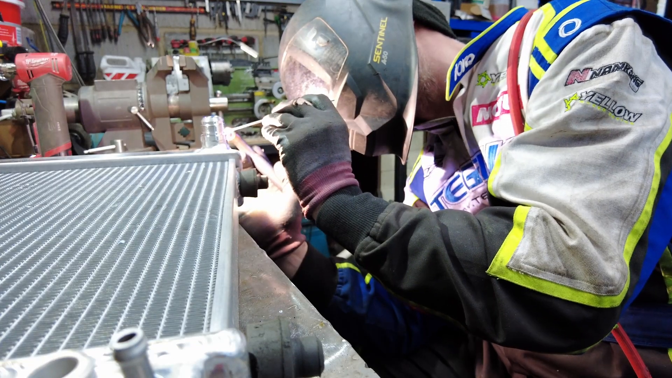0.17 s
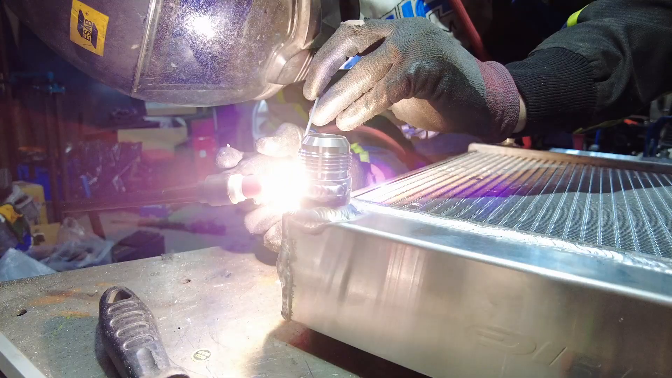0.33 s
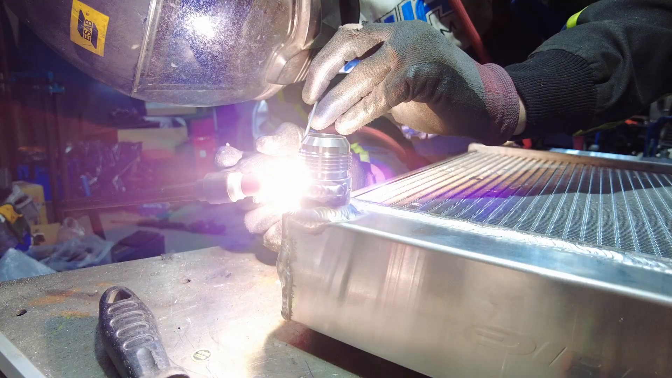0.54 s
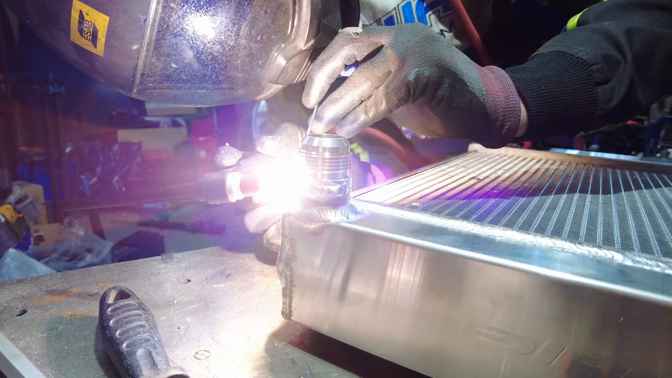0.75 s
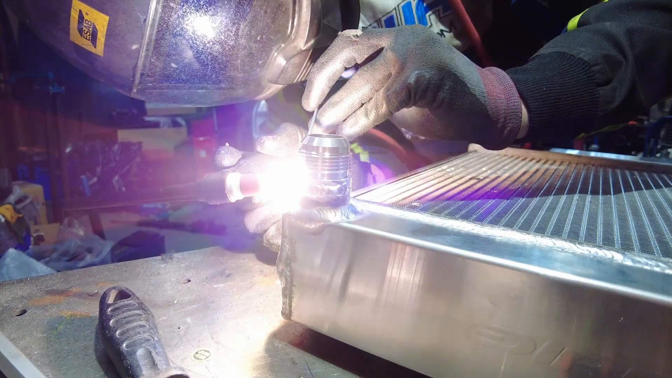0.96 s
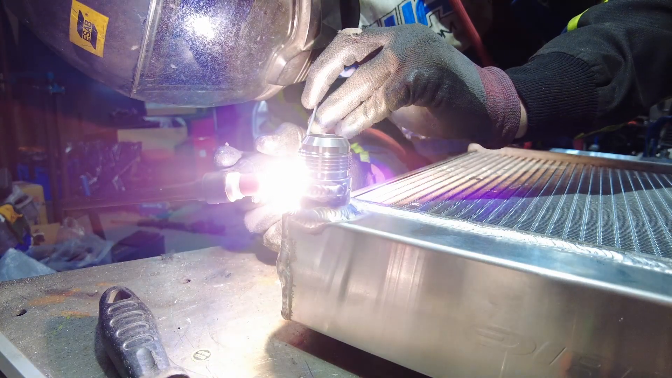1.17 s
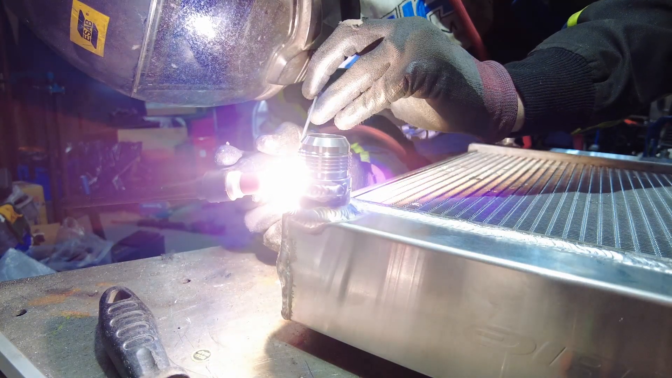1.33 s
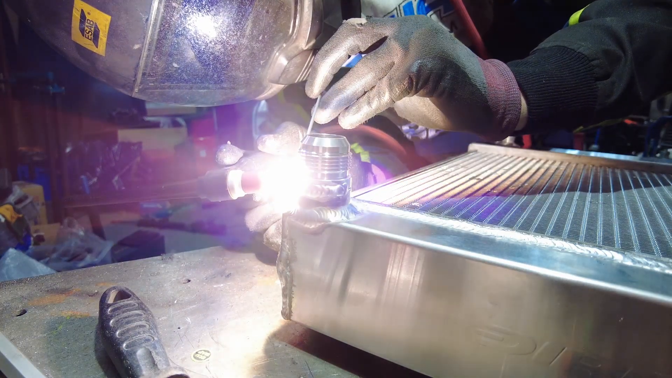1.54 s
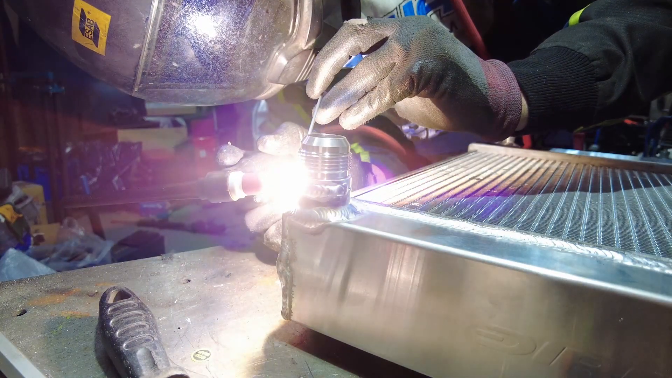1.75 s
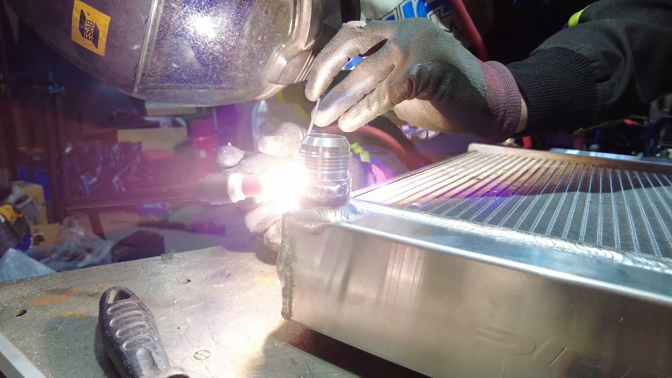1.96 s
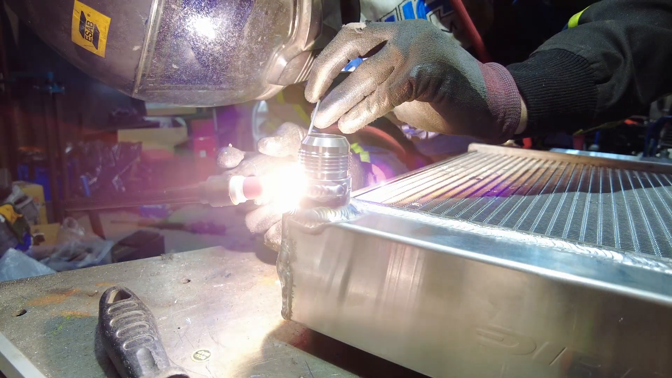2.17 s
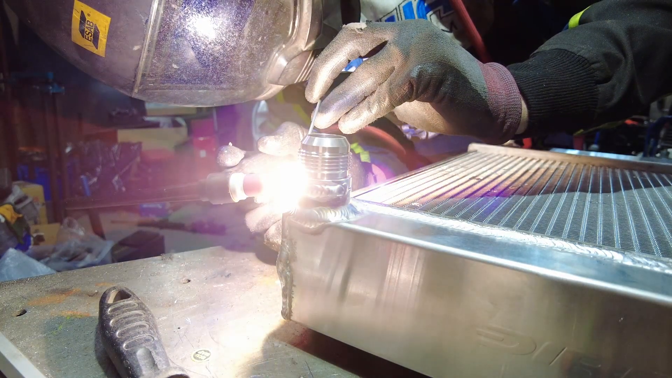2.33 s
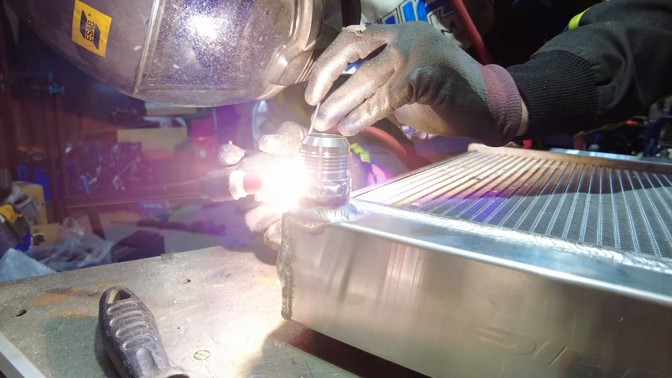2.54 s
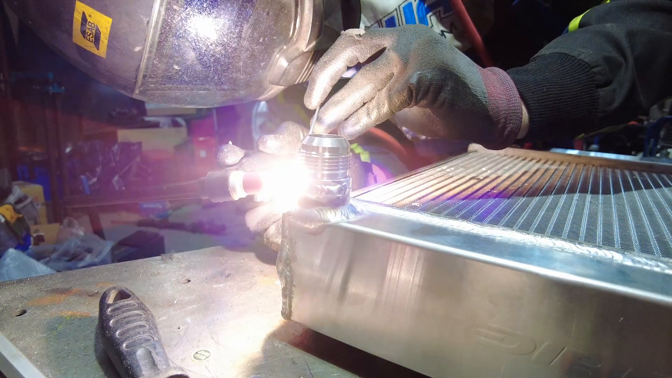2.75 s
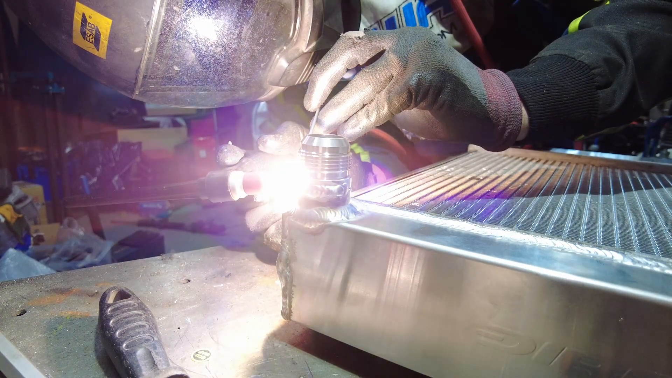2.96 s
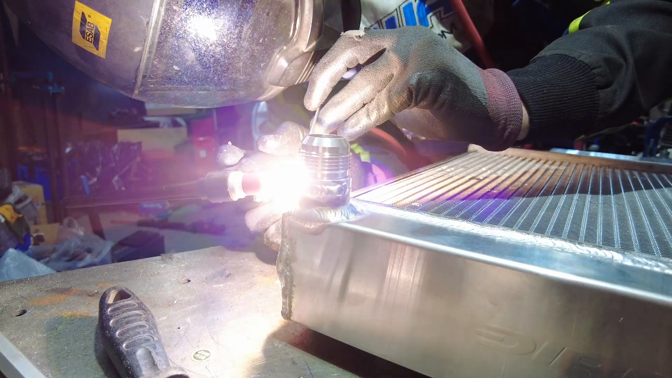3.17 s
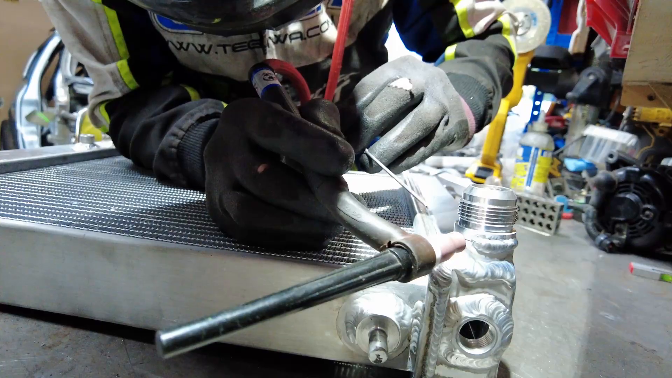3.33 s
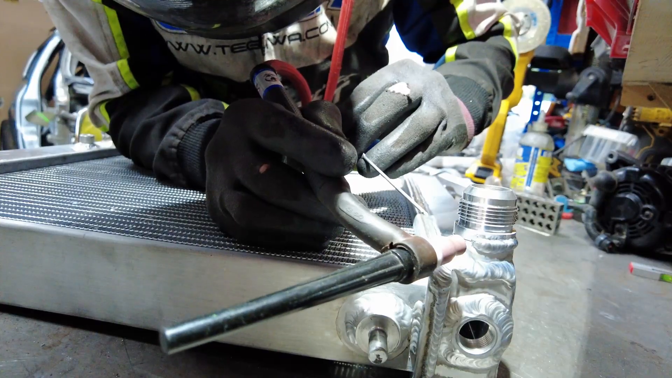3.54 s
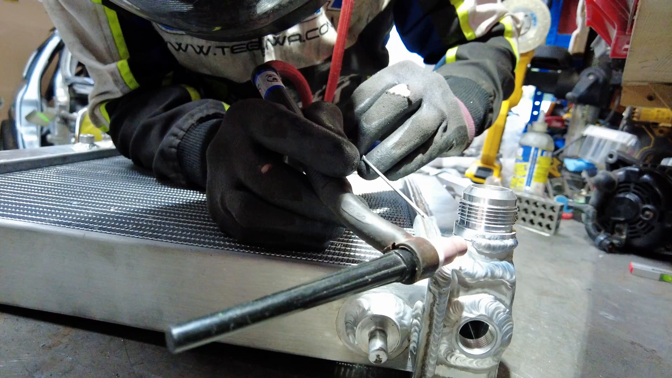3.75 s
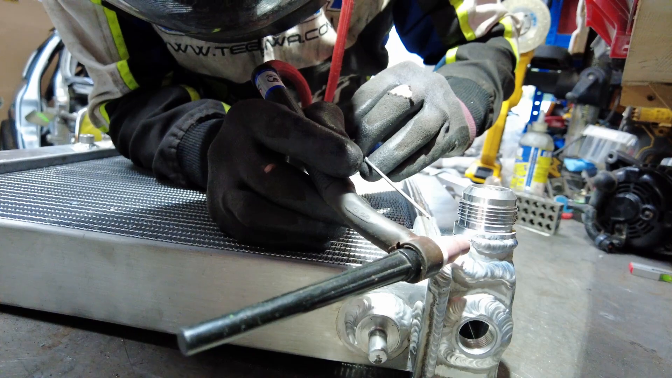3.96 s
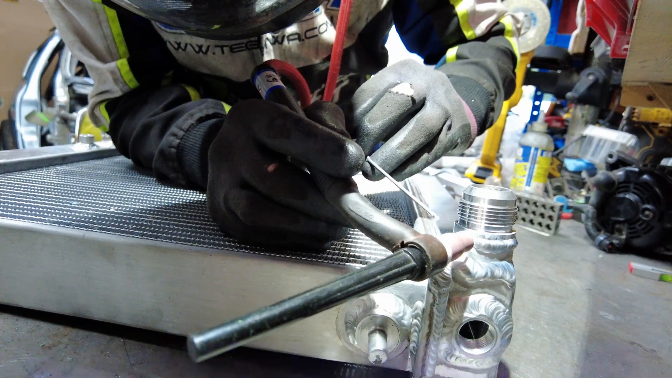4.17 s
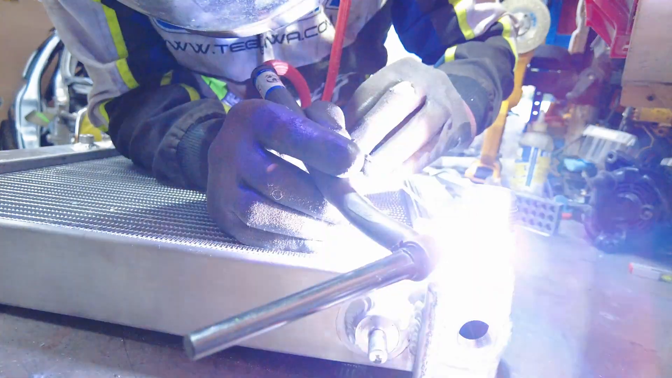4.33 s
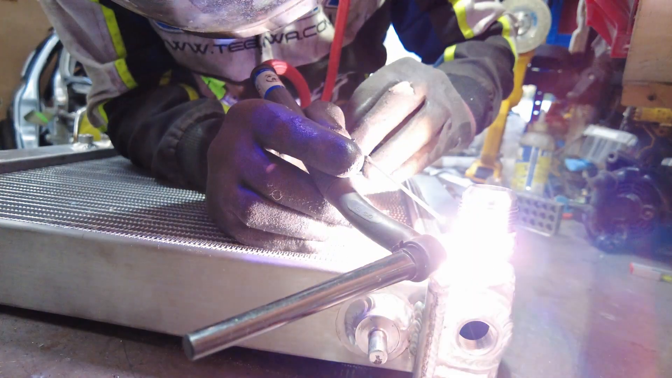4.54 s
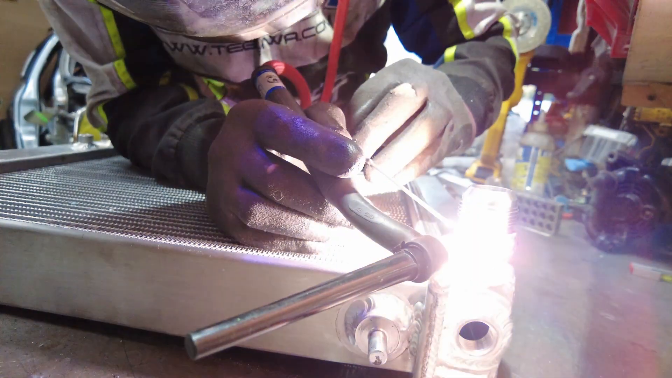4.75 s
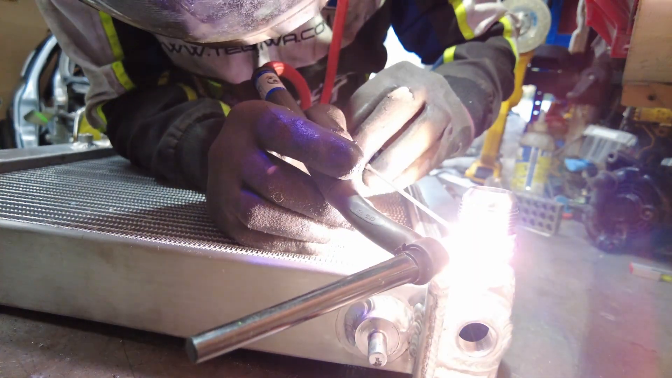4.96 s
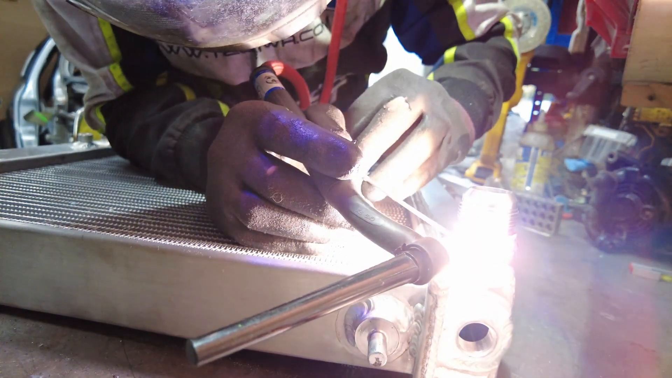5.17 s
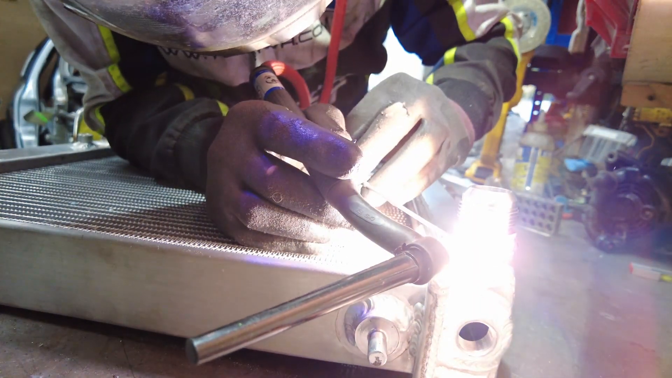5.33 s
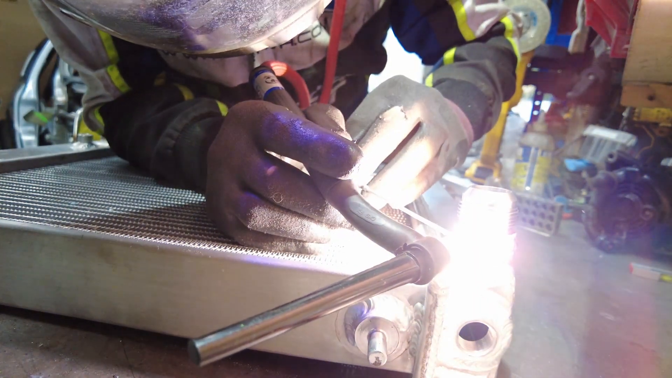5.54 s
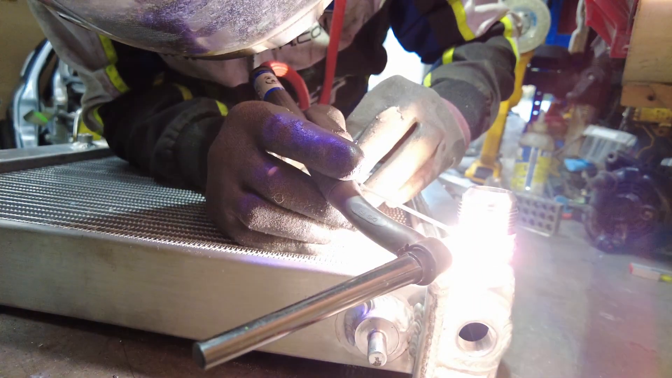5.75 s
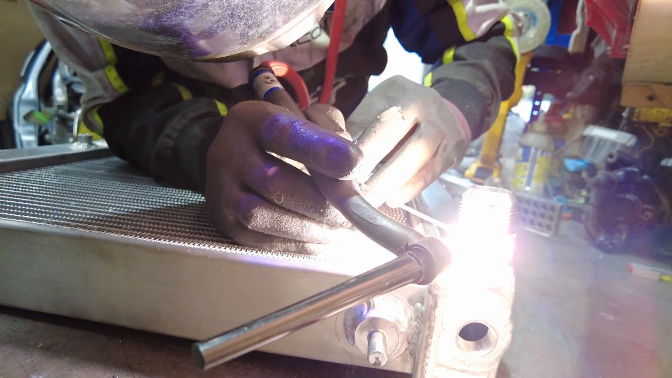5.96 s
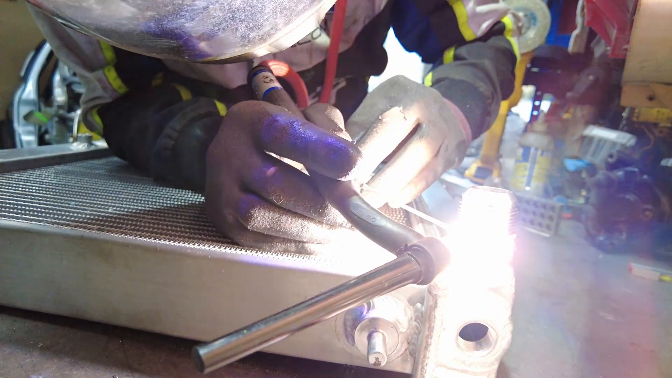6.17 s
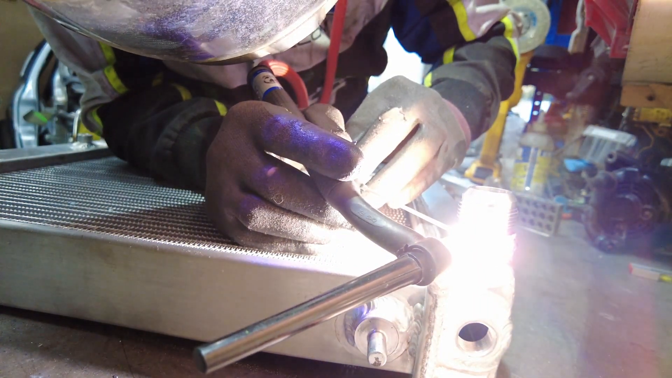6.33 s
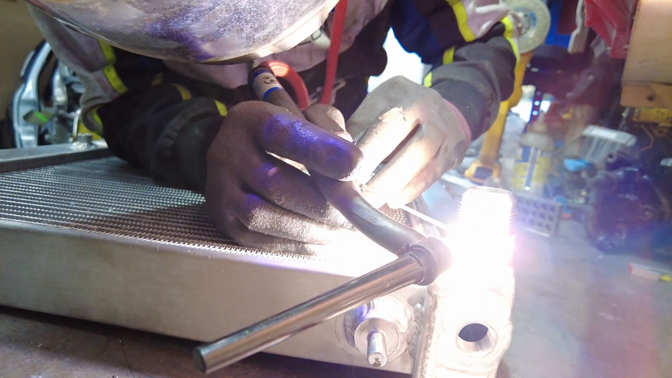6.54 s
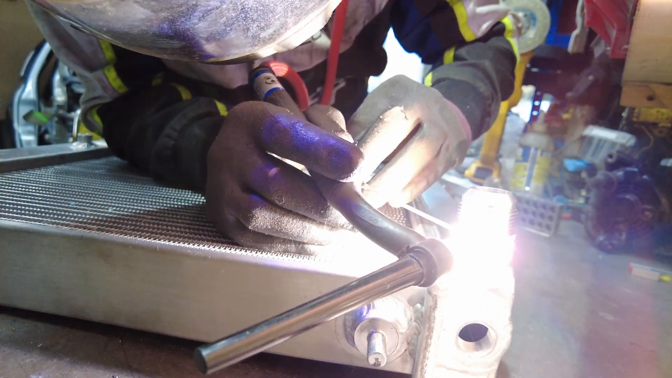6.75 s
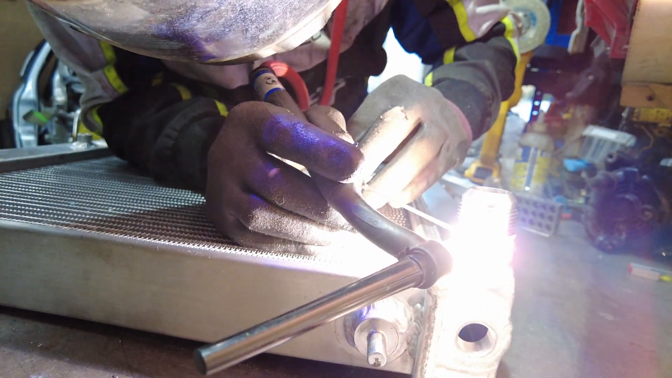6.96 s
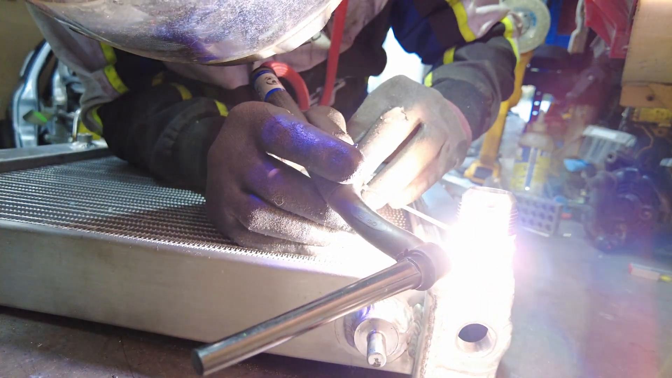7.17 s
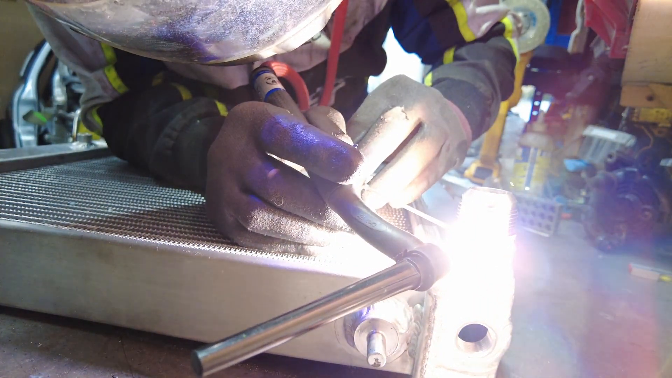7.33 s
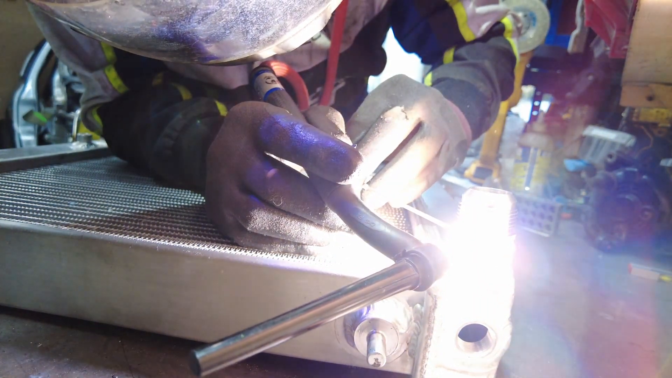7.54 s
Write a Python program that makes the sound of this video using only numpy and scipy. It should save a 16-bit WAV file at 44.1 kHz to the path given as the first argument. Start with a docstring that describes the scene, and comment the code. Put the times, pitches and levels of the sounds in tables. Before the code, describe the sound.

A welding arc buzzes harsh and bright over fan and gas hiss, cuts out for a second, then crackles alight and buzzes on, sputtering.

```python
"""AC TIG welding on an aluminium radiator, heard from afar, then beside the torch, then facing it.
A fan and shielding gas hiss throughout (coloured noise). Over them the arc buzzes: at both current
reversals of each cycle comes a low pop and a bright snap, which the nearby metal colours and scatters.
The treble widens, then the arc pauses and leaves fan and gas alone, with a soft knock near the end.
The arc fizzes (noise) and stutters alight (a run of cracks), buzzes on and later sputters in low thumps."""
import sys
import numpy as np
from scipy import signal
from scipy.fft import rfft, irfft, next_fast_len
from scipy.io import wavfile
from scipy.ndimage import uniform_filter1d

SR = 44100
rng = np.random.default_rng(int(sys.argv[2]) if len(sys.argv) > 2 else 0)


def master_out(mix):
    """Clip the mix to full scale and print it as 16-bit PCM to the path in sys.argv[1]."""
    frames = np.transpose(np.atleast_2d(mix))
    ceiling = np.clip(frames, -1, 1)
    pcm = np.round(ceiling * 32767).astype(np.int16)
    wavfile.write(sys.argv[1], SR, pcm)


N = 335150
T = np.arange(N) / SR
PADDED = next_fast_len(N + 16384, real=True)  # spare room so that filtering does not wrap round
HZ = np.arange(PADDED // 2 + 1) * SR / PADDED


def undb(db):
    """Turn decibels into gain."""
    return 10 ** (np.asarray(db) / 20)


def unit(x):
    """Scale to rms 1."""
    return x / np.sqrt(np.mean(x ** 2))


def colour(points):
    """Gain at every frequency, joined up from (f/Hz, level/dB) points."""
    hz, db = np.transpose(points)
    return undb(np.interp(np.log(HZ + 1), np.log(hz), db))


def band(lo_hz, hi_hz, order=8):
    """Gain of a band with soft edges; a higher order makes them steeper."""
    return 1 / np.sqrt((1 + (lo_hz / (HZ + 1)) ** order) * (1 + (HZ / hi_hz) ** order))


def shape(x, gain):
    """Filter by a gain at every frequency."""
    return irfft(rfft(x, PADDED) * gain, PADDED)[:N]


def ring(x, response):
    """Start a copy of the response at every impulse."""
    return signal.fftconvolve(x, response)[:N]


def tail(decay_s, size=8192):
    """Dense reflections dying away: unit energy, even in colour but with a fine comb of its own."""
    noise = rng.standard_normal(size)
    spectrum = rfft(noise * np.exp(-T[:size] / decay_s))
    smooth_power = uniform_filter1d(np.abs(spectrum) ** 2, size=48)
    return irfft(spectrum / np.sqrt(smooth_power))


def clicks(times, sizes, count=8):
    """Impulses that may fall between two samples, each drawn as a windowed sinc."""
    at = np.asarray(times)[:, None] * SR
    index = np.floor(at).astype(int) + np.arange(1 - count, count + 1)
    window = np.cos(np.pi * (index - at) / (2 * count)) ** 2
    taps = np.sinc(index - at) * window
    values = np.asarray(sizes)[:, None] * taps
    return np.bincount(np.clip(index, 0, N - 1).ravel(), values.ravel(), N)


def after(x, decay_s, size=4096):
    """Envelope that jumps at every impulse and dies away."""
    return np.sqrt(np.abs(ring(x ** 2, np.exp(-2 * T[:size] / decay_s))))


def steady(x, count=16000):
    """Bring the slow level to rms 1, keeping the flutter."""
    return x / np.sqrt(uniform_filter1d(x ** 2, count))


def walk(per_s):
    """Random levels held for a moment and smoothed twice; spread 1."""
    k = int(SR / per_s)
    held = np.repeat(rng.standard_normal(512), k)[:N]
    return unit(uniform_filter1d(uniform_filter1d(held, k), k))


def curve(points):
    """Join (t/s, value) points by straight lines."""
    return np.interp(T, *np.transpose(points))


# Colour of the fan and gas noise: f/Hz, level/dB (only the differences count)
AIR_COLOUR = [(30, -10), (100, 10.5), (240, 3.5), (370, 13.5), (700, 3.5), (1400, -4), (2400, 1.5),
              (3000, 12), (4300, 11), (6800, -11.5), (9500, -2), (11000, -6), (13000, 0), (15500, -8)]
AIR_DB = -45  # rms
# Their steady tones: f/Hz, width/Hz, level/dB (rms)
AIR_TONES = [(227, 15, -62), (254, 14, -54), (369, 57, -57), (2775, 91, -60), (3230, 45, -60),
             (4110, 88, -51.5), (9470, 620, -59)]


def idle():
    """Fan and shielding gas: coloured noise, narrow wavering tones and one soft knock before the strike."""
    air = unit(shape(rng.standard_normal(N), colour(AIR_COLOUR))) * undb(AIR_DB)
    tones = 0
    for hz, width, db in AIR_TONES:
        resonance = 1 / (1 + (2 * (HZ - hz) / width) ** 2)
        tones = tones + undb(db) * unit(shape(rng.standard_normal(N), resonance))
    knock_noise = unit(shape(rng.standard_normal(N), band(270, 330, order=5)))
    knock = after(clicks([4.14], [1]), 0.055) * knock_noise
    return air + tones + undb(-40.5) * knock


# Turning points, t/s: afar ends, pause begins, striking begins, arc burns again
TURNS_S = (.245, 3.328, 4.207, 4.305)


def ignition():
    """The starting spark: a fizz of noise that grows until the arc holds, then quickly drops away."""
    turns = [TURNS_S[2], TURNS_S[3], TURNS_S[3] + .004]
    growth = np.interp(T, turns, undb([-37, -30, -90]), left=0, right=0)
    return growth * unit(shape(rng.standard_normal(N), band(1500, 15000, order=2)))


# Sputters: t/s, level/dB (before shaping), sign of the pressure step
SPUTTERS = [(6.2455, -5, 1), (6.294, -7.5, -1), (6.6274, -5.5, 1), (6.6553, -11, -1), (6.6830, -8, -1),
            (6.7250, -3, 1), (6.7385, -7.5, -1), (6.7736, -13, 1), (7.358, -14, -1), (7.4141, -5, 1),
            (7.449, -21, -1), (7.5460, -5, 1)]


def thumps():
    """Sputters: pressure swings one way, jumps across and sinks back, with a short rough splash."""
    s, db, sign = np.transpose(SPUTTERS)
    steps = clicks(s, undb(db) * np.sign(sign))
    # run backwards, so that the swing builds up to the jump
    swing = ring(steps[::-1], np.exp(-T[:4096] / 0.0054))[::-1]
    sink_hz = 38
    sink = np.exp(-T[:4096] / 0.0077) * np.cos(2 * np.pi * sink_hz * T[:4096])
    jump = ring(steps, sink)
    splash = after(clicks(s, undb(db)), 0.0054) * rng.standard_normal(N)
    thump = shape(0.91 * jump - 0.43 * swing, band(17, 1740, order=2))
    return thump + shape(undb(-1) * splash, band(200, 1630, order=3))


# Run of cracks as the arc strikes; levels before shaping, the fade is per doubling of the count
STUTTER_S, STUTTER_GAP_S, STUTTER_DB, STUTTER_FADE_DB = 4.2125, .0096, -3.5, 4


def stutter(count=7):
    """Rows (t/s, level/dB) of cracks while the arc tries to hold, each weaker than the last."""
    k = np.arange(count)
    db = STUTTER_DB - STUTTER_FADE_DB * np.log2(k + 1)
    return np.column_stack([STUTTER_S + STUTTER_GAP_S * k, db])


# Single loud crackles: t/s, level/dB (before shaping)
CRACKLES = [(0.261, -13.5), (.2740, -10), (0.2813, -9.5), (0.331, -12.5), (0.358, -11), (0.3719, -13),
            (0.379, -12), (0.405, -14), (0.915, -12.5), (1.715, -15), (1.8317, -12.5), (1.873, -13),
            (2.061, -10), (2.491, -11.5), (2.854, -5), (2.969, -13), (3.304, -13.5), (4.281, -4.5),
            (4.2987, -7), (7.5457, -10)]


def cracks():
    """Sudden collapses of the arc: a sharp dip of pressure, an echo off the workpiece, a spray of hiss."""
    s, db = np.vstack([stutter(), CRACKLES]).T
    hits = clicks(s, undb(db))
    echo = 0.15 * clicks(s + 0.0013, undb(db))
    dips = -ring(hits + echo, np.exp(-T[:4096] / 0.00124))
    spray = after(hits, 0.0022) * rng.standard_normal(N)
    low = shape(1.23 * dips, band(71, 4500, order=2))
    return low + shape(undb(-1.5) * spray, band(300, 3800, order=2))


# Hollows between torch, glove and tank, as the hands move: start t/s, end t/s, f/Hz, width/Hz, lift/dB
HOLLOWS_RINGING = [(0.995, 1.8, 715, 130, 7.5), (1.85, 2.15, 1420, 130, 5), (2.756, 3.4, 750, 199, 10.5),
                   (4.4, 5.0, 1420, 130, 3.5), (5.098, 5.55, 700, 130, 9), (5.246, 6.1, 1420, 130, 6),
                   (4.3, 6.1, 14500, 700, 1.5), (6.99, 7.7, 690, 150, 8.5), (7.1, 7.7, 1140, 400, 2.5)]


def swell(x, span):
    """Each hollow lifts its own narrow band for a while, then fades again."""
    out = x
    for start, end, hz, width, db in HOLLOWS_RINGING:
        if span[0] < (start + end) / 2 < span[1]:
            progress = np.clip((T - start) / (end - start), 0, 1)
            rise = np.sqrt(np.abs(np.sin(np.pi * progress)))
            resonance = 1 / (1 + (2 * (HZ - hz) / width) ** 4)
            out = out + (undb(db) - 1) * rise * shape(x, resonance)
    return out


def scatter(x, span, decay_s, hold_s):
    """Near reflections that slowly blend from one pattern to the next as torch and hands move."""
    out = 0
    for knot in np.arange(span[0], span[1] + hold_s, hold_s):
        fade = np.cos(np.pi / 2 * np.clip((T - knot) / hold_s, -1, 1))
        out = out + ring(x, tail(decay_s)) * fade
    return out


BALANCE = .41  # share of a cycle between its first and second reversal


def pop_sound(pops, even_clicks, hum, span, pop_colour, rush_db, hum_db):
    """The gas column collapses in a low pop, with echoes, rushing gas and a hum."""
    # slow heating and cooling repeats more evenly than the pop's sharp edge
    evened = pops - 0.043 * shape(pops + even_clicks, band(160, 240, order=4))
    echoes = .6 * shape(scatter(pops, span, .0014, .6), band(400, 8000, order=4))
    rush = after(pops, .002) * rng.standard_normal(N)
    low = shape(unit(evened + echoes) + undb(rush_db) * unit(rush), colour(pop_colour))
    low = swell(unit(low) + undb(hum_db) * unit(hum), span)
    return unit(shape(low, band(14, 2100, order=5)))


SPIT_DB, SPIT_LOW_HZ, SPIT_HIGH_HZ = -13, 1260, 4500  # level against the pops
SPIT_POWER = 2.2  # strong pops spit far more than weak ones


def spit_sound(times, strength):
    """Spits: a click and a very short burst of noise at every pop."""
    spits = -clicks(times, strength ** SPIT_POWER)
    bursts = after(spits, .0006) * rng.standard_normal(N)
    return undb(SPIT_DB) * unit(shape(bursts + spits, band(SPIT_LOW_HZ, SPIT_HIGH_HZ)))


SNAP_RING_S, HISS_S = 0.0033, 0.0079  # fading times of a snap's near reflections and its hiss


def snap_sound(at_tip, at_metal, span, direct):
    """Re-ignition snaps repeat almost exactly, so their reflections fuse into a bright buzz; adds hiss."""
    snaps = at_tip + at_metal
    # tip and metal each have reflections of their own
    near_tip = scatter(at_tip, span, SNAP_RING_S, .6)
    near_metal = scatter(at_metal, span, SNAP_RING_S, .45)
    buzz = direct * snaps + near_tip + near_metal + .2 * ring(snaps, tail(.025))
    buzz = swell(buzz / np.std(snaps), span)
    hiss = unit(after(snaps, HISS_S) * rng.standard_normal(N))
    return buzz, hiss


def arc(span, first_s, hz, levels, pop_colour, rings, back_pop, back_snap, unrest_db, direct,
        hiss_db, sizzle_db, rush_db, bite, hum_db):
    """Two reversals a cycle, each a low pop of uneven size, a steady sharp snap and a puff of hiss."""
    cycles = first_s + np.arange(int(N / SR * hz)) / hz
    times = np.concatenate([cycles, cycles + BALANCE / hz])
    back = np.arange(len(times)) >= len(cycles)  # the second reversal of each cycle
    pop_shift, pop_chance, snap_shift, snap_chance = rng.standard_normal((len(times), 4)).T
    size = np.where(back, back_pop, 1)
    strength = size * undb(unrest_db * np.clip(pop_chance, -2, 1.6))
    pops = -clicks(times + 1e-5 * pop_shift, strength)  # minus: pulses of low pressure
    # one half of the cycle runs hotter than the other: a hum on the switching rate
    hum = -np.cos(2 * np.pi * (hz * (T - first_s) - BALANCE * back_pop / (1 + back_pop)))
    low = pop_sound(pops, clicks(times, size), hum, span, pop_colour, rush_db, hum_db)
    low = low + spit_sound(times, strength)

    snap_times = times + 2e-6 * snap_shift
    snap_sizes = undb(.8 * snap_chance + .45 * pop_chance)
    # one snap starts at the electrode, the other at the metal
    at_tip = -clicks(snap_times[~back], snap_sizes[~back])
    at_metal = -back_snap * clicks(snap_times[back], snap_sizes[back])
    buzz, hiss = snap_sound(at_tip, at_metal, span, direct)
    lift_db = sum(db / (1 + (2 * (HZ - f) / width) ** 4) for f, width, db in rings)
    metal = undb(lift_db)
    sizzle = shape(buzz + undb(sizzle_db) * hiss + bite * unit(pops), metal * band(2200, 6500, order=10))
    bright = shape(buzz + undb(hiss_db) * hiss, metal * band(8050, 22700, order=24))
    on = (T >= span[0]) & (T < span[1])
    return on * sum(steady(x) * undb(db) for x, db in zip((low, sizzle, bright), levels))


# the pops flutter at random; the snaps take a share of their quick changes;
# the sizzle lies this share of the way from snap level to pop level, before trims
FLUTTER_PER_S, FLUTTER_DB = 22, 1.6
SNAP_FOLLOWS, SIZZLE_FOLLOWS = 0.24, 0.27


def loudness(pop_db, snap_db, pop_trim_db, sizzle_trim_db, snap_trim_db, count=18000):
    """Levels of pop, sizzle and snap: one unsteady arc drives all three."""
    pop = pop_db + FLUTTER_DB * walk(FLUTTER_PER_S)
    snap = snap_db + SNAP_FOLLOWS * (pop - uniform_filter1d(pop, count))
    sizzle = snap + SIZZLE_FOLLOWS * (pop - snap)
    return pop + pop_trim_db, sizzle + sizzle_trim_db, snap + snap_trim_db


# Colour of one pop at each place: f/Hz, level/dB (only the differences count)
AFAR_COLOUR = [(40, -19), (144, -1), (288, -39), (431, 1.6), (719, -10), (1150, 1), (1869, -2)]
BESIDE_COLOUR = [(40, -4.5), (144, 6.5), (288, -5.5), (432, -7.5), (575, -3.5), (719, -12.5), (863, -2.5),
                 (1007, -8.5), (1151, -4), (1295, -10), (1439, -14.5), (1582, -4), (1726, -10),
                 (1870, -15.5)]
FACING_COLOUR = [(40, -5.5), (144, -4), (288, -9.5), (431, -9.5), (575, -13.5), (719, -19), (863, -9),
                 (1006, -17), (1150, -12.5), (1294, -15), (1438, -18), (1581, -10), (1725, -14.5),
                 (1869, -22.5)]
# Resonances of torch cup and workpiece at each place: f/Hz, width/Hz, lift/dB
AFAR_METAL = [(2800, 700, 2), (5980, 1300, 9), (7910, 83, 17), (8600, 220, 14), (9400, 250, 13),
              (10780, 34, 16.5), (13400, 4800, 14)]
BESIDE_METAL = [(2594, 23, 7.6), (2875, 28, 7.7), (3250, 600, 4.9), (5470, 130, 3.5), (6550, 780, 4.8),
                (7480, 400, 8.4), (8600, 160, 2.2), (11060, 82, 4.5), (11570, 900, 2.1), (12500, 1400, 4.7),
                (15060, 220, 8), (15000, 400, 4.3)]
FACING_METAL = [(2930, 300, 3.6), (3080, 33, 3.1), (4320, 170, 5.9), (5300, 97, 4.4), (7780, 710, 7.9),
                (9500, 480, 5.8), (11050, 890, 7.3), (12800, 330, 4.6), (14400, 2300, 6)]
# How hard the arc pops, following its length and current: t/s, level/dB (before flutter and trim)
BESIDE_POP_LEVEL = [(0.26, -30), (0.29, -30.5), (0.36, -28), (0.47, -30.5), (0.59, -23.5), (0.87, -28.5),
                    (0.92, -23.5), (0.95, -34), (1.15, -26), (1.31, -28.5), (1.73, -23), (1.79, -26.5),
                    (1.96, -23), (2.38, -29), (2.62, -24), (2.73, -28.5), (2.96, -19), (3.32, -25.5)]
FACING_POP_LEVEL = [(4.33, -34), (4.57, -30.5), (5.08, -30.5), (5.14, -23.5), (5.23, -27.5), (5.53, -27),
                    (5.62, -24.5), (5.98, -24), (6.01, -28), (6.34, -27.5), (6.4, -32.5), (6.49, -23.5),
                    (6.52, -29), (6.6, -27), (6.93, -28), (7.35, -19), (7.59, -24)]
# Slowly changing level of the bright snaps: t/s, level/dB (before flutter and trim)
BESIDE_SNAP_LEVEL = [(0.26, -20), (0.44, -25), (0.62, -22), (1.0, -23), (1.75, -19.5), (2.76, -22.5),
                     (2.94, -23.5), (3.32, -26.5)]
FACING_SNAP_LEVEL = [(4.33, -27.5), (4.66, -25), (5.2, -23), (5.88, -22.5), (6.35, -27), (7.3, -25.5),
                     (7.59, -28.5)]
AFAR_POP_DB, AFAR_SNAP_DB = -39, -30.5  # also before flutter and trim


def welding():
    """The same arc from three places, each with its own balance of pops, snaps and reflections."""
    afar_levels = loudness(AFAR_POP_DB, AFAR_SNAP_DB,
                           pop_trim_db=0.5, sizzle_trim_db=0.2, snap_trim_db=-0.5)
    beside_levels = loudness(curve(BESIDE_POP_LEVEL), curve(BESIDE_SNAP_LEVEL),
                             pop_trim_db=0.7, sizzle_trim_db=-3.0, snap_trim_db=0.96)
    facing_levels = loudness(curve(FACING_POP_LEVEL), curve(FACING_SNAP_LEVEL),
                             pop_trim_db=0.5, sizzle_trim_db=-4.5, snap_trim_db=-0.4)
    afar = arc((0, TURNS_S[0]), first_s=.0049, hz=143.80, levels=afar_levels,
               pop_colour=AFAR_COLOUR, rings=AFAR_METAL,
               hiss_db=-9, sizzle_db=-3, rush_db=-6, unrest_db=5.0,
               back_pop=1.0, back_snap=0.91, direct=0.19, bite=0.12, hum_db=-27.5)
    beside = arc(TURNS_S[:2], first_s=.0036, hz=143.86, levels=beside_levels,
                 pop_colour=BESIDE_COLOUR, rings=BESIDE_METAL,
                 hiss_db=-8, sizzle_db=-4, rush_db=-8, unrest_db=2.1,
                 back_pop=0.73, back_snap=1.0, direct=0.05, bite=0.049, hum_db=-12.5)
    facing = arc((TURNS_S[3], N / SR), first_s=.0051, hz=143.76, levels=facing_levels,
                 pop_colour=FACING_COLOUR, rings=FACING_METAL,
                 hiss_db=-6, sizzle_db=-2, rush_db=-12, unrest_db=1.9,
                 back_pop=1.37, back_snap=0.78, direct=0.09, bite=0.047, hum_db=-13.5)
    return afar + beside + facing


def scene():
    """From afar the workshop spreads the buzz; later all is central, but treble widens before the pause."""
    mid = idle() + ignition() + thumps() + cracks() + welding()
    walls = ring(mid, tail(0.025))
    wide = undb(-2.5) * (T < TURNS_S[0]) * shape(walls, band(400, 16000, order=3))
    treble = shape(walls, band(3330, 16000, order=40) * band(20, 8000, order=2))
    widening = undb(-8.5) * ((T > 3.05) & (T < TURNS_S[1])) * treble
    side = wide + widening
    return np.array([mid + side, mid - side])


TOP_HZ = 15750


def record(dry):
    """Clip the very loudest peaks flat, then cut everything above the top frequency."""
    top_cut = 1 / (1 + np.exp(np.minimum((HZ - TOP_HZ) / 30, 50)))
    return np.array([shape(x, top_cut) for x in np.clip(dry, -.9, .9)])


dry = scene()
out = record(dry)
master_out(out)
```